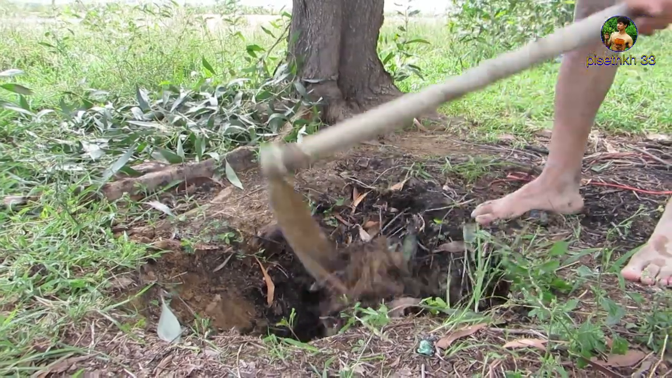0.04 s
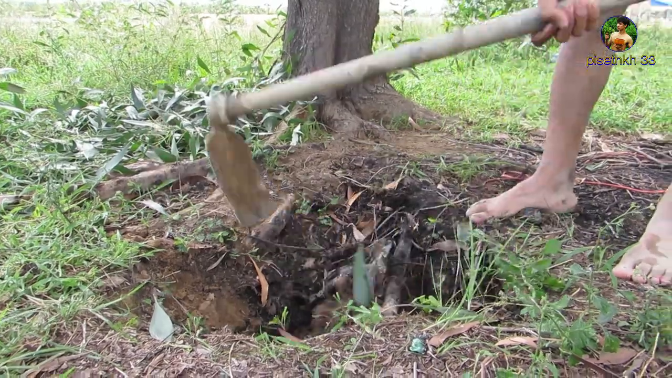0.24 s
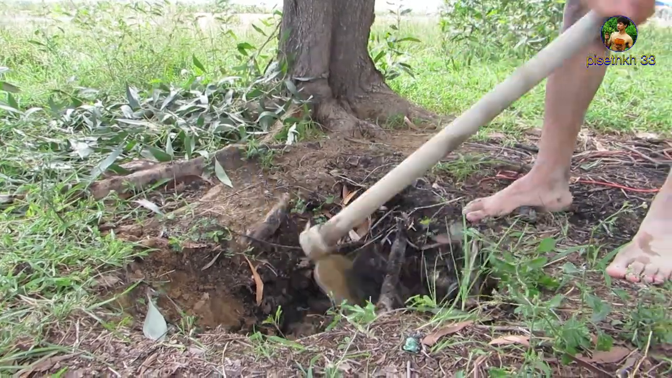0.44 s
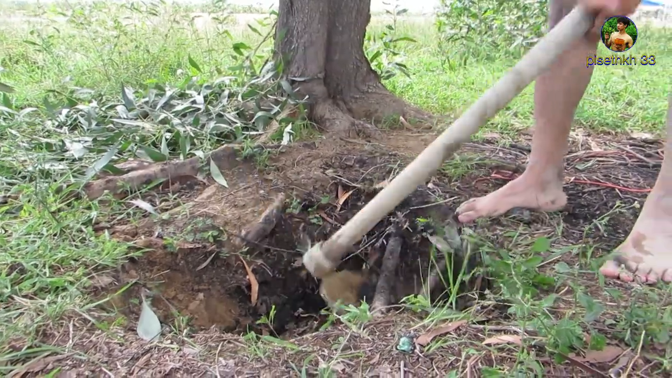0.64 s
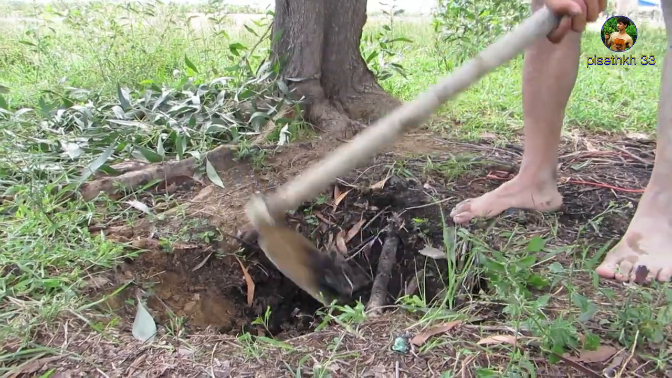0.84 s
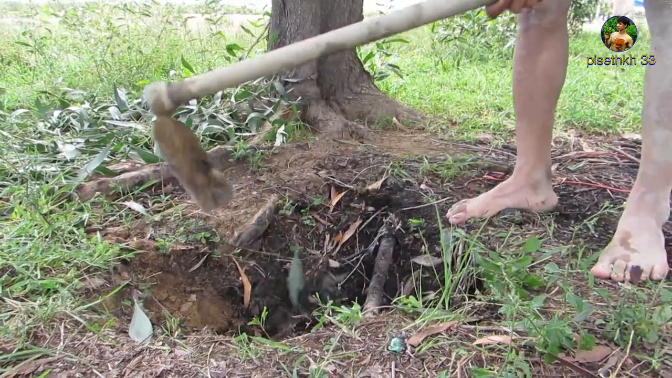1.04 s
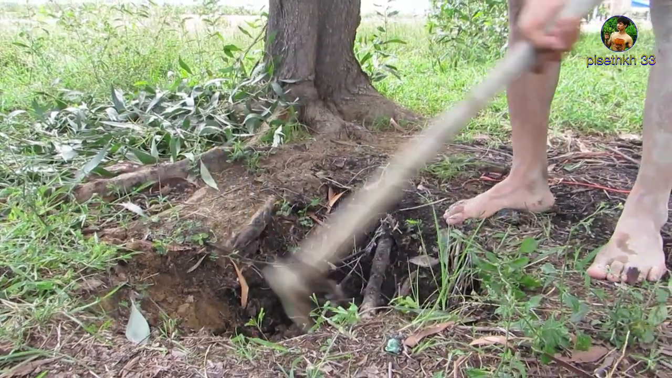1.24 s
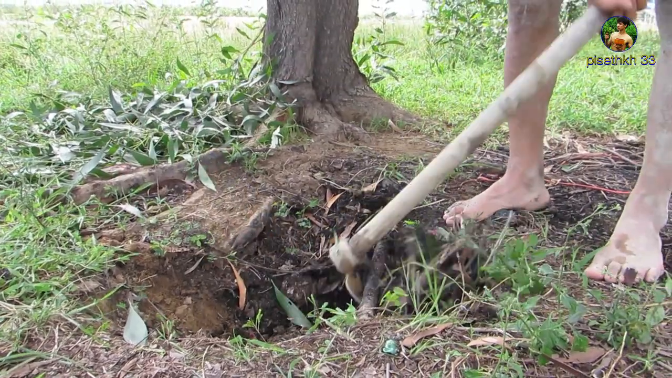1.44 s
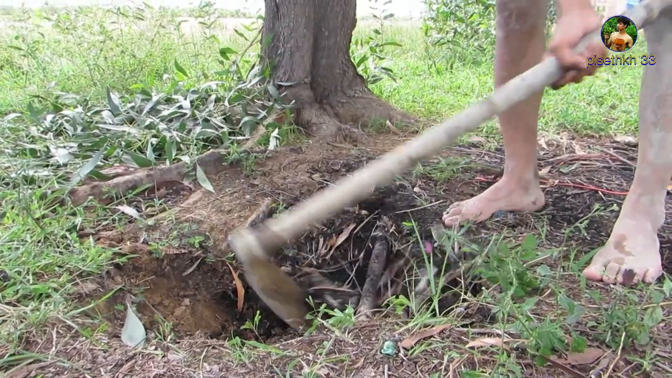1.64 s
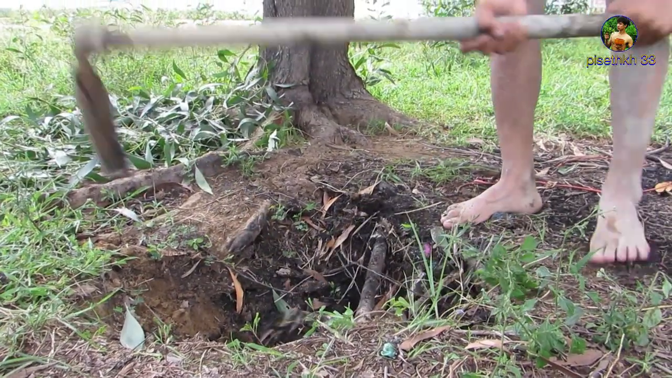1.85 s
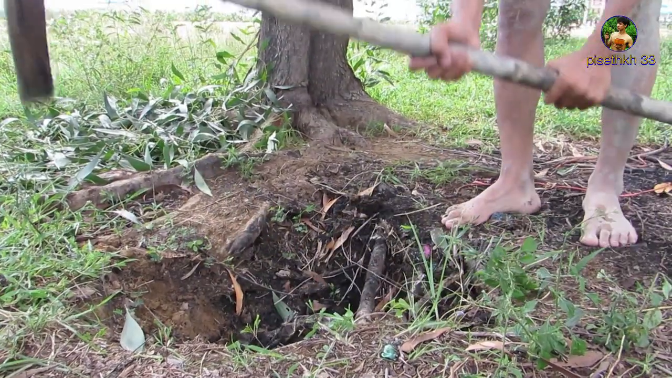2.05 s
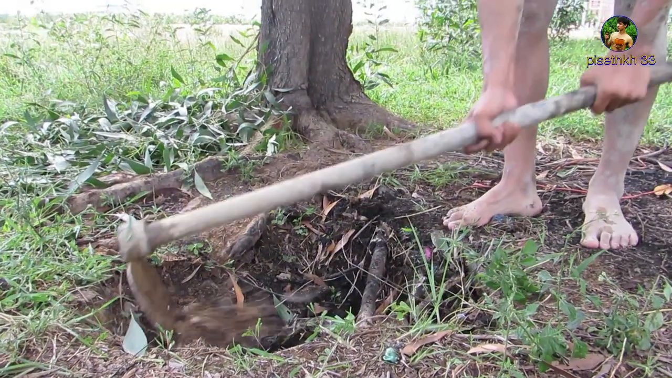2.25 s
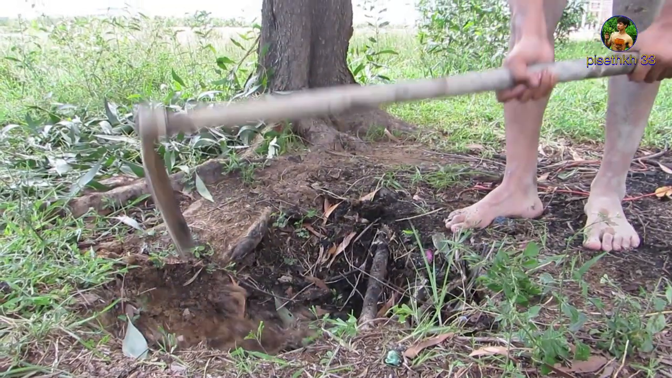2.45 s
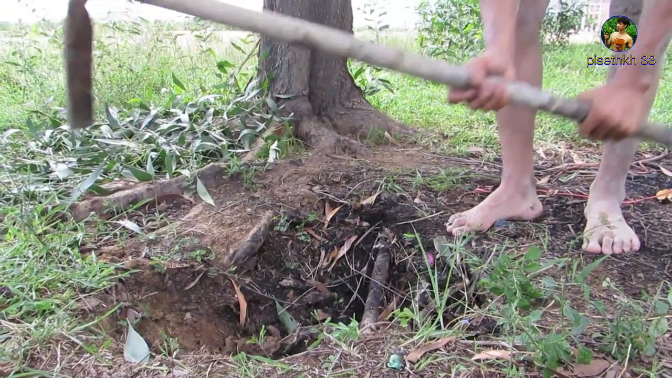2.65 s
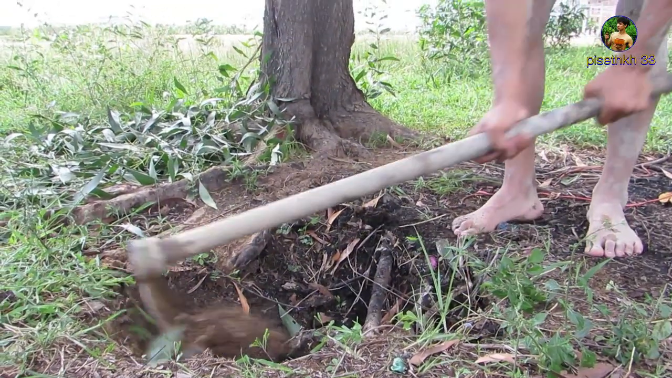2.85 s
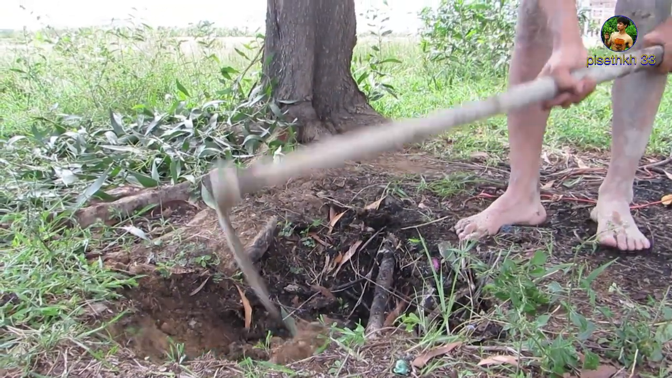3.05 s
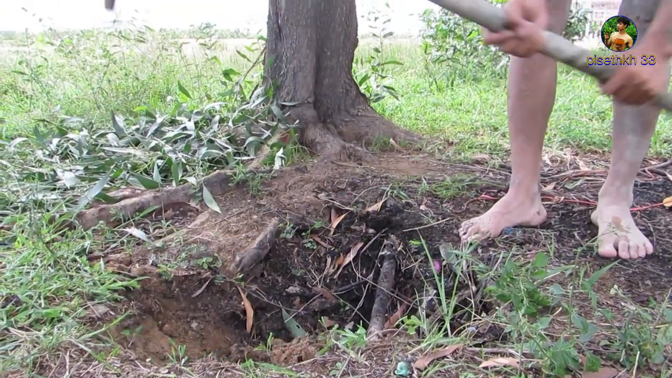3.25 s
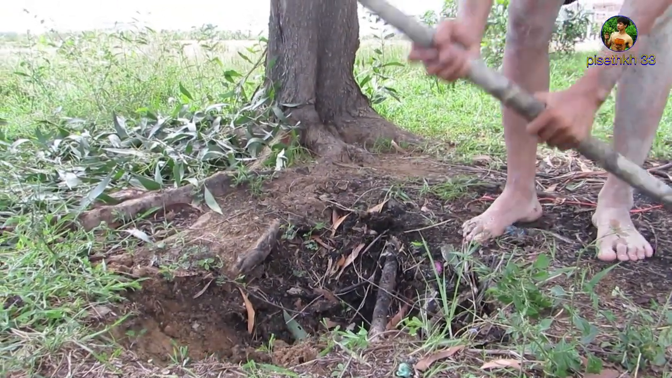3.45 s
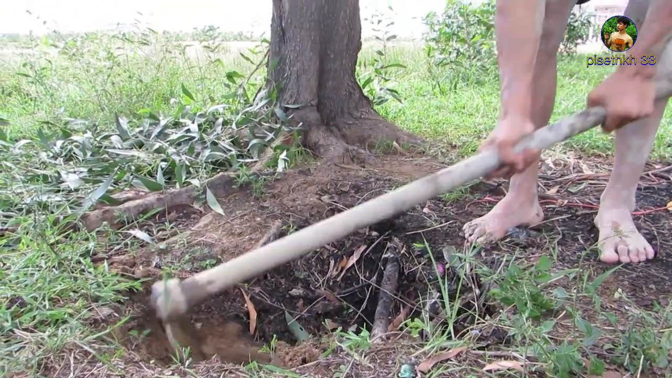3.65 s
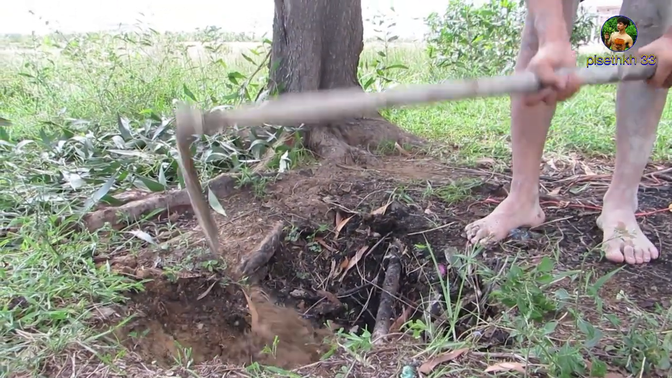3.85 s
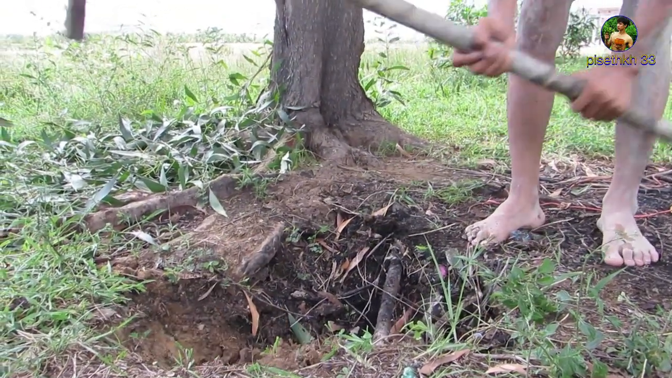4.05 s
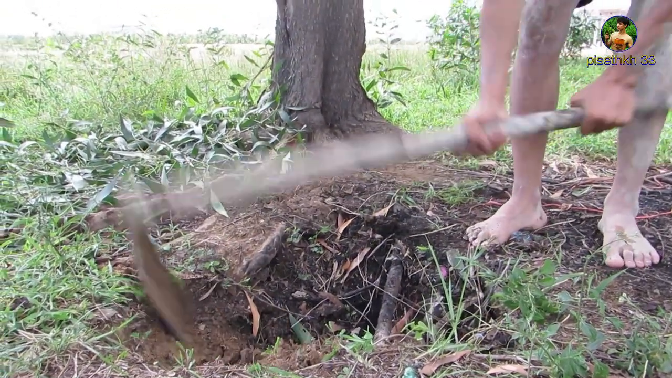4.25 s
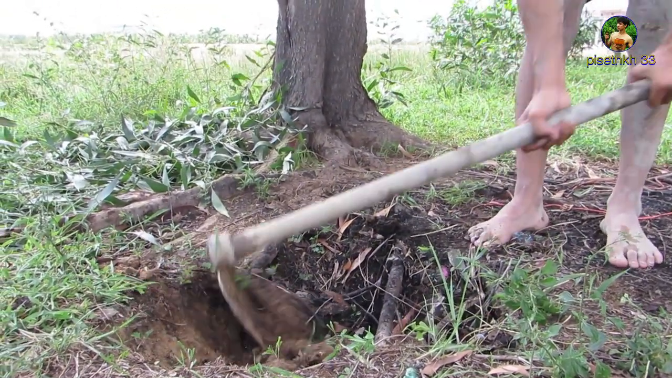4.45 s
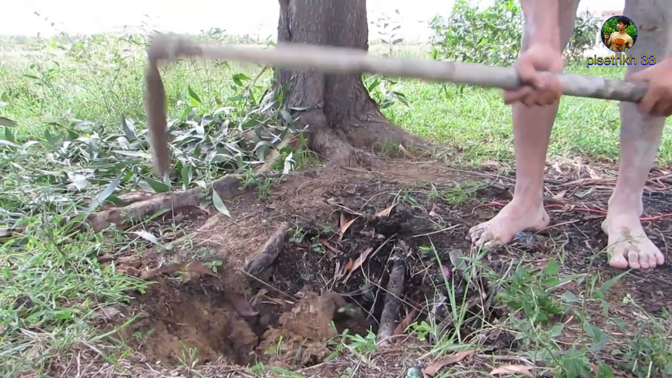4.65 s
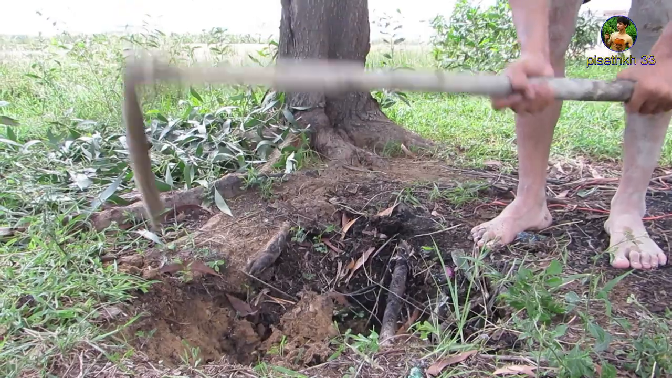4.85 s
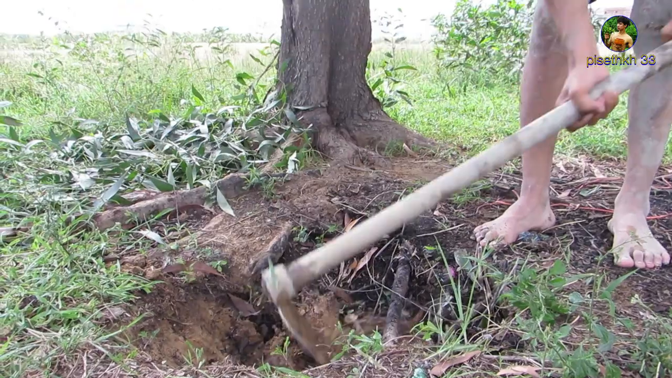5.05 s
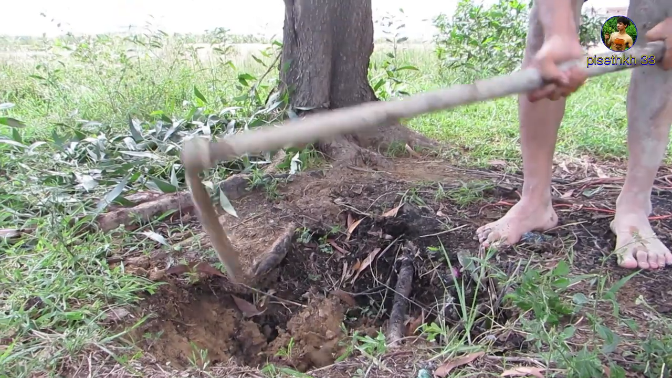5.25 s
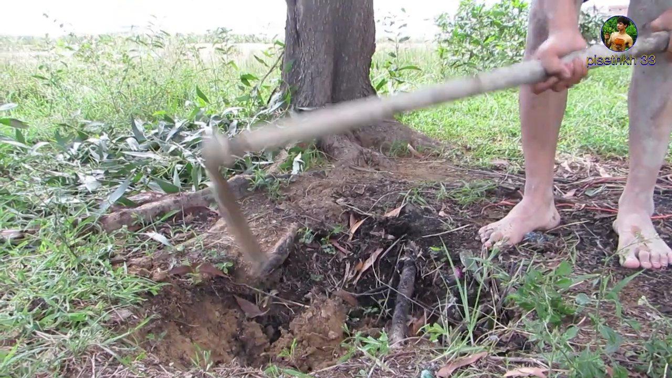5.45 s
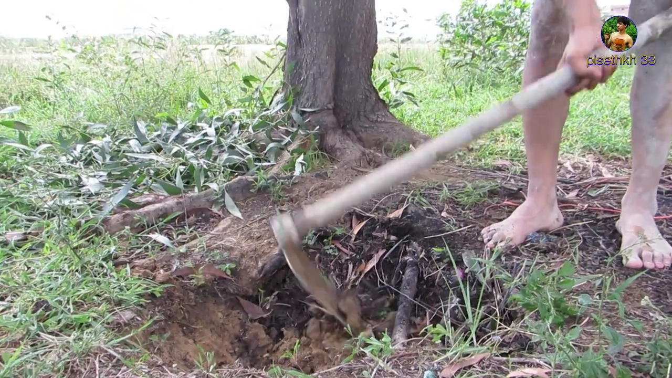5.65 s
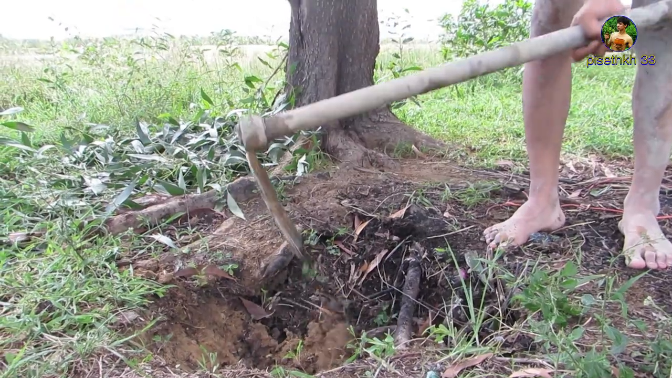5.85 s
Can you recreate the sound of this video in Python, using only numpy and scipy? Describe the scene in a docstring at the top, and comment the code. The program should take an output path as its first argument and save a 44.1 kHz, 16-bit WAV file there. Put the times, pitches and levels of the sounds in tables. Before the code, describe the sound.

Outdoors, wind rumbles steadily over the microphone while a hoe chops into the ground nearby about eight times. Roots and twigs crack loudly on the opening stroke, and a later one catches a stone with a very brief metallic ring. The remaining blows thud and crunch into packed earth, with crumbs of dirt sifting down after each. Far leaves rustle softly and a bird gives two barely audible squeaks.

```python
"""Hoe in dry soil

A steel hoe chops into soil and roots close to a camera: crumbs crush against the blade, twigs snap,
packed earth thuds, and once the edge sings on a stone. Loose earth trickles back into the hole.
Wind rumbles over the microphone and rustles far leaves; a bird squeaks twice.
The camera's gain control ducks after the loudest blows."""
import sys
import numpy as np
from scipy import signal
from scipy.fft import rfft, irfft, next_fast_len
from scipy.io import wavfile
from scipy.ndimage import uniform_filter1d, map_coordinates

SR = 44100
rng = np.random.default_rng(int(sys.argv[2]) if len(sys.argv) > 2 else 0)


def file_out(sig):
    """Save sig as 16-bit WAV at sys.argv[1]."""
    # one column per channel
    cols = np.atleast_2d(sig).T
    # limit, then scale
    lim = np.clip(cols, -1, 1)
    pcm = np.round(lim * 32767).astype(np.int16)
    wavfile.write(sys.argv[1], SR, pcm)


N = 260631

# grit and fine sand spectra: (frequency [Hz], relative density [dB])
GRIT_SPECTRUM = [(700, -18), (1500, -5), (2800, -4), (4800, -8.5), (7000, -29)]
SAND_SPECTRUM = [(3500, -9), (5500, 4), (8000, 3), (11500, -1), (13500, -7), (14800, -20), (16000, -21.5)]


def crunches():
    """Crumbs crush against the blade: the same impacts sound as grit, sand and clod."""
    # (hardest [s], rise [s], hold [s], fall [s], grit [dB], sand re grit [dB], clod re grit [dB])
    bites = [(0.368, 0.00078, 0.014, 0.042, -16, 1.5, -21), (0.413, .002, .002, 0.052, -16, -7, -17),
             (0.461, .002, .002, 0.016, -23, -8, -26), (0.472, .003, 0.02, 0.018, -17, -8, -37),
             (0.497, .003, 0.0038, 0.04, -19, -6, -19), (.564, 0.024, .002, 0.044, -34, -7, -18.5),
             (.588, .002, .002, .02, -30, -13, -31), (0.61, .008, .004, 0.033, -33, -5, -20),
             (0.652, 0.0044, 0.0046, 0.073, -31.5, -11.5, -10),
             (0.694, 0.0073, 0.055, 0.11, -44, -17, -12.5), (1.237, 0.0023, .02, .02, -40, -6, -10),
             (1.271, 0.026, 0.0084, .15, -32, -5, -6.5), (1.349, .015, .003, .03, -33.5, -5, -18),
             (1.408, 0.068, .005, 0.056, -30.5, -7.5, -8.5), (1.461, 0.0044, 0.0016, .045, -30, -12, -24),
             (1.926, 0.16, 0.011, 0.043, -43, -1, -18), (2.166, 0.0036, .015, .02, -46, 8.5, -30),
             (2.196, 0.011, 0.0026, 0.026, -17.5, 0, -5.5), (2.273, 0.033, .002, 0.025, -38, -10, -12),
             (2.378, 0.024, 0.12, .04, -49, -3, -5), (2.776, .014, 0.023, 0.023, -26, -2.5, -1),
             (2.831, .002, .01, 0.26, -39.5, -11, -18), (2.955, 0.047, .005, .05, -44.5, -17, -1),
             (3.143, 0.2, .005, 0.045, -51, -3.5, -8), (3.578, .001, .006, 0.023, -38, -1, -16),
             (3.588, .002, .005, .02, -26, -10, -8), (3.595, 0.0064, 0.0026, 0.024, -18.5, -6, -3.5),
             (3.655, .003, 0.0036, 0.024, -38.5, -4.5, -16), (4.237, .012, .03, .02, -49, 4.5, -12),
             (4.291, 0.013, .003, 0.034, -20.5, -8, -5.5), (4.336, .01, .01, 0.09, -41.5, -3, -9),
             (4.585, 0.016, .003, .06, -46, -5, -25), (4.948, 0.00089, 0.029, .02, -33, -6, 2),
             (4.979, 0.018, .004, 0.026, -21.5, -14.5, -11), (5.006, .005, .005, 0.13, -41, -6, -9),
             (5.084, 0.025, .005, 0.048, -42, -8, 2.5), (5.512, 0.011, 0.013, 0.032, -35, -2.5, -1),
             (5.539, 0.02, .002, 0.029, -24.5, -0.5, -6), (5.594, .02, 0.016, 0.028, -43, -7, -18),
             (5.636, 0.017, .003, 0.035, -36.5, -3, -3.5)]
    # (frequency [Hz], relative density [dB])
    clod_spectrum = [(180, -46), (330, -5.5), (480, 8.5), (640, -8.5), (900, 2.5), (1400, -25.5),
                     (2200, -74)]
    # (frequency [Hz], left-right coherence [0-1])
    coherence = [(500, 0.73), (2000, 0.93), (5000, 0.87), (12000, 0.39)]
    edge_db, sand_share = 20.5, 0.63  # loss per rise or fall; sand lingers
    power = np.zeros((3, N))
    for s, rise, hold, fall, db, sand_db, clod_db in bites:
        a, b = max(round((s - rise) * SR), 0), round((s + hold + 3 * fall) * SR)
        lost_db = edge_db * loss(s, rise, hold, fall)[a:b]
        power[:, a:b] += amp([db - lost_db, db + sand_db - sand_share * lost_db,
                              db + clod_db - lost_db]) ** 2
    level = np.sqrt(power)
    crush = grains(rate_hz=900, spread_db=4, hiss=2.2)
    grit = unit(coloured(crush, GRIT_SPECTRUM, coherence) + .25 * unit(blade(crush[:1])))
    sand = coloured(crush, SAND_SPECTRUM, coherence)
    clod = coloured(crush, clod_spectrum, coherence)
    return level[0] * grit + level[1] * sand + level[2] * clod


def snaps():
    """Twigs break, stones hit the blade: a sharp pulse, a few rough cycles, a dry crack on top."""
    # (time [s], level [dB], pitch [Hz], left minus right [dB])
    breaks = [(0.09, -18.5, 2180, 1), (0.3673, 1, 1900, 2), (0.3697, 7, 11500, 5), (0.3702, -2, 5000, -4),
              (.3806, -18, 3130, 1.5), (0.3839, 9.5, 2820, 2), (.3936, -3, 1160, 5), (.4155, -2, 1160, 4),
              (.4165, -2, 4500, 0), (.4324, -4, 5290, -2), (.4608, 2, 2340, 0), (0.4738, 6, 2330, 2),
              (0.476, -4.5, 1310, 5), (0.4868, 8.5, 4070, 1), (0.5, -1, 5300, 0), (0.5035, 4, 4380, -2),
              (0.522, -6.5, 2830, -2), (0.5386, -19, 1270, 9), (0.5595, -4, 3060, 2),
              (0.5892, -5.5, 2400, 0), (.611, -21, 1930, 3), (0.6185, -20, 1080, 1), (.6504, -17, 5160, -3),
              (0.6608, -20, 2620, 3), (0.6798, -18, 2010, -6), (0.7016, -10, 2120, 3),
              (0.8594, -25, 2260, -1), (0.8993, -24, 2940, .6), (1.039, -18.5, 2730, .6),
              (1.2385, -24, 2120, -1), (1.3624, -17, 3310, -3), (1.3919, -10, 3050, -2),
              (1.419, -12, 4810, 0), (1.4645, -8.5, 3300, -2), (1.468, -23, 1190, 6),
              (1.6344, -21.5, 2340, -.6), (1.6578, -25, 2210, 6), (1.77, -16.5, 2430, -.6),
              (1.86, -31.5, 2370, -15.5), (2.183, -20.5, 3030, 2.5), (2.1925, 0.5, 3250, 8),
              (2.1974, -6, 1760, -4), (2.2167, -8, 3160, -2), (2.2732, -16.5, 2470, 3),
              (2.296, -26, 2430, 1), (2.561, -31, 3270, 3), (2.7706, -18, 1750, 18), (2.792, -7, 1790, 1.5),
              (2.8374, -17.5, 3220, 10), (2.873, -27, 3000, 1), (2.9606, -24, 2190, 3),
              (3.5881, -14, 2650, 9), (3.5925, -7, 870, 7), (3.5967, -4, 2420, 0), (3.658, -25, 980, 6),
              (4.277, -25, 3230, 3), (4.286, -21, 1850, 4), (4.2909, -9, 2560, 7), (4.292, -11, 910, 6),
              (4.342, -24, 1770, 4), (4.5812, -27.5, 2680, .6), (4.9497, -24, 950, 1),
              (4.9712, -17, 1020, 0), (4.9766, -10.5, 1590, 7), (4.9842, -12, 3600, 0),
              (5.0763, -20, 3660, -1), (5.0865, -20, 1600, 3), (5.2033, -26, 2540, .6),
              (5.5063, -25, 958, 1), (5.5308, -7, 2700, -3), (5.529, -4, 11600, 3), (5.535, -8, 1030, 3),
              (5.5361, 2, 5130, 0), (5.5458, -16, 1170, 6), (5.546, -6, 9000, 4), (5.5804, -20.5, 1180, 3),
              (5.5923, -20.5, 3670, .6), (5.6291, -26, 1130, .6), (5.6485, -21, 3260, -3)]
    t60_cycles, crack_db = 16.7, -20
    out, t = np.zeros((2, N + SR)), np.arange(SR // 25) / SR
    noises = rng.standard_normal((len(breaks), 2, len(t)))
    treble = signal.butter(1, [5500, 11000], "band", fs=SR, output="sos")
    for (s, db, hz, pan_db), (noise, hiss) in zip(breaks, noises):
        fade = amp(-60 * t * hz / t60_cycles) * (1 - np.exp(-t * hz / 0.76))
        # fibres part one after another, widening the pitch to a band
        band = signal.butter(2, [hz / 1.7, hz * 1.7], "band", fs=SR, output="sos")
        fibres = unit(signal.sosfilt(band, noise))
        body = fade * (.55 * np.sin(2 * np.pi * hz * t) + .5 * fibres)
        click = 0.38 * amp(-60 * t * hz / 3) * np.sin(2 * np.pi * 0.84 * hz * t)
        crack = amp(crack_db - 60 * t / 0.009) * signal.sosfilt(treble, hiss)
        gains = amp(db + np.array([[pan_db], [-pan_db]]) / 2)
        out[:, round(s * SR):][:, :len(t)] += gains * (click + body + crack)
    return out[:, :N] + 0.0078 * blade(out[:, :N])


def thuds():
    """The blade stops in packed earth: a dull push and its rebound."""
    # (time [s], relative level [dB], pitch [Hz], push or pull [+1/-1])
    stops = [(.368, -15.5, 480, 1), (2.191, -18, 264, -1), (2.196, -31, 168, 1), (2.774, -13.5, 151, 1),
             (2.785, -20, 114, -1), (3.593, -7.5, 163, -1), (3.607, -15, 110, 1), (4.293, -13.5, 137, -1),
             (4.947, -14.5, 287, 1), (4.965, -32, 138, -1), (5.534, -19.5, 354, 1)]
    out, t = np.zeros(N + SR), np.arange(SR // 10) / SR
    for s, db, hz, polarity in stops:
        fade = amp(db + 2.5 - 60 * t * hz / 6)
        out[round(s * SR):][:len(t)] += polarity * fade * np.sin(2 * np.pi * hz * t)
    return out[:N]


def skid():
    """The edge skids on a stone: one blade mode swells under stick-slip and stops dead."""
    # (start [s], catch [s], pitch [Hz], start level [dB], catch level [dB])
    slips = [(2.174, 2.1935, 2930, -38, -13)]
    out, t = np.zeros(N), np.arange(N) / SR
    for start, catch, hz, start_db, catch_db in slips:
        swell = amp(np.interp(t, [start, catch, catch + 0.0047], [start_db, catch_db, -70]))
        out += (t > start) * (t < catch + .003) * swell * np.sin(2 * np.pi * hz * t)
    return out


def blade(force):
    """The steel rings briefly, damped by the soil."""
    # (frequency [Hz], level [dB], t60 [s])
    modes = [(1223, -7, 0.035), (1810, -22, 0.1), (2912, -15, 0.095), (5420, -16, 0.018),
             (7560, -62.5, 0.045)]
    t = np.arange(SR // 10) / SR
    ring = sum(amp(db - 60 * t / t60) * np.sin(2 * np.pi * hz * t) for hz, db, t60 in modes)
    return signal.fftconvolve(force, ring[None], axes=1)[:, :N]


def trickle():
    """Loose earth runs back in tiny impacts, over a steady rustle of leaves."""
    # (fullest [s], swell [s], fade [s], grit [dB], sand re grit [dB])
    spills = [(0, .1, 0.35, -41, -2.5), (.6, 0.14, 0.5, -49.5, -0.5), (1.1, 0.28, 0.17, -53, -1.5),
              (1.41, 0.18, 0.6, -42, -4), (1.9, 0.28, 0.11, -51.5, 3), (2.45, 0.6, 0.35, -50.5, -2),
              (2.93, .15, 0.32, -43, -2), (3.43, 0.12, 0.11, -48, -5.5), (3.74, 0.3, 0.35, -48, -7.5),
              (4.45, .12, .5, -50, -0.5), (5.1, 0.081, 0.26, -49, -5.5), (5.66, .1, .15, -55, -2)]
    # (frequency [Hz], left-right coherence [0-1])
    coherence = [(1400, 0.15), (3100, 0.56), (7000, 0.52), (14000, 0.27)]
    leaf_mid_db, leaf_treble_db = -52.5, -58
    edge_db = 12  # loss per swell or fade
    power = amp([[leaf_mid_db], [leaf_treble_db]]) ** 2
    for s, swell, fade, db, sand_db in spills:
        level_db = db - edge_db * loss(s, swell, 0, fade)
        power = power + amp([level_db, level_db + sand_db]) ** 2
    sift = amp(1.1 * wobble(30))
    grit = coloured(sift * grains(rate_hz=300, spread_db=5.5, hiss=4.1), GRIT_SPECTRUM, coherence)
    sand = coloured(sift * grains(rate_hz=250, spread_db=7, hiss=4.8), SAND_SPECTRUM, coherence)
    return np.sqrt(power[0]) * grit + np.sqrt(power[1]) * sand


def wind():
    """Eddies at the microphone ports: coherent in the bass, unrelated higher up."""
    # (time [s], level [dB])
    gusts = [(0, -27.5), (.25, -28), (.55, -29.5), (.8, -31.5), (1.3, -27.5), (1.74, -27), (2.05, -26.5),
             (2.45, -31.5), (2.85, -27.5), (3.3, -29.5), (3.8, -30.5), (4.4, -31), (4.8, -29),
             (5.05, -31.5), (5.4, -28.5), (5.91, -30.5)]
    # (frequency [Hz], relative density [dB])
    rumble_spectrum = [(12, -27), (20, -12.5), (38, 2.5), (59, -2.5), (91, -0.5), (102, -1), (119, -4),
                       (188, -7.5), (260, -25), (340, -59), (570, -120)]
    flutter_spectrum = [(120, -11.5), (200, -1), (295, -7), (355, -8.5), (465, -18.5), (691, -18.5),
                        (1500, -29.5), (1950, -60), (3300, -120)]
    # (frequency [Hz], left-right coherence [0-1])
    coherence = [(60, 0.99), (130, 0.98), (290, 0.88), (640, 0.0098), (1400, 0.033)]
    flutter_offset_db, flutter_swing = -6, 0.81
    rumble_db, = curves(gusts)
    mean_db = rumble_db.mean()
    flutter_db = mean_db + flutter_offset_db + flutter_swing * (rumble_db - mean_db)
    rumble = coloured(rng.standard_normal((2, N)), rumble_spectrum, coherence)
    eddies = amp(2.33 * wobble(25)) * rng.standard_normal((2, N))
    flutter = coloured(eddies, flutter_spectrum, coherence)
    return amp(rumble_db + 0.34 * wobble(45)) * rumble + amp(flutter_db) * flutter


def bird():
    """Two far, arched squeaks, made of overtones only."""
    # per call: (time [s], pitch [Hz], level [dB])
    calls = [
        [(3.11, 1210, -56), (3.13, 1305, -53), (3.146, 1304, -50), (3.155, 1240, -64)],
        [(3.71, 1210, -62), (3.722, 1300, -53), (3.738, 1390, -49.5), (3.749, 1220, -63)],
    ]
    # (harmonic [number], relative level [dB])
    overtones = [(2, -6), (3, 3), (4, 1), (5, -1)]
    out, t = np.zeros(N), np.arange(N) / SR
    for call in calls:
        hz, db = curves(call)
        phase = 2 * np.pi * np.cumsum(hz) / SR
        gate = (t > call[0][0]) & (t < call[-1][0])
        tone = sum(amp(level_db) * np.sin(k * phase) for k, level_db in overtones)
        out += gate * amp(db + 3.3 * wobble(250)) * tone
    return out


def housing(hz):
    """Response of the microphone housing: two narrow dips."""
    # (centre [Hz], width [Hz], depth [0-1])
    notches = [(3978, 294, 1), (8060, 300, 0.5)]
    return np.prod([1 - depth * 1j * hz * width / (centre ** 2 - hz ** 2 + 1j * hz * width)
                    for centre, width, depth in notches], axis=0)


def gain_control(x):
    """Loud middle and treble pull the gain down fast; it returns at a steady rate."""
    threshold_db, slope, attack_s, release_db_per_s = -21, 0.93, 0.015, 26.5
    sidechain = filtered(x.mean(0), lambda hz: hz / (hz + 500))
    level_db = 10 * np.log10(np.abs(uniform_filter1d(sidechain ** 2, size=440)) + 1e-12)
    cut_db = slope * np.maximum(level_db - threshold_db, 0)
    ramp_db = release_db_per_s * np.arange(N) / SR
    held_db = np.maximum.accumulate(cut_db + ramp_db) - ramp_db
    pole = np.exp(-1 / (attack_s * SR))
    return x * amp(-signal.lfilter([1 - pole], [1, -pole], held_db))


def grains(rate_hz, spread_db, hiss):
    """Random tiny impacts of uneven size over a bed of hiss."""
    hit = rng.random(N) < rate_hz / SR
    size = uniform_filter1d(hit * amp(spread_db * np.clip(rng.standard_normal(N), -2, 2)), size=24)
    return (unit(size) + hiss) * rng.standard_normal((2, N))


def loss(peak_s, rise_s, hold_s, fall_s):
    """0 while held, 1 at a rise before and a fall after, growing on from there."""
    t = np.arange(N) / SR - peak_s
    return np.maximum(-t / rise_s, 0) + np.maximum(t - hold_s, 0) / fall_s


def coloured(pair, spectrum, coherence):
    """Two unrelated signals to stereo at rms 1, with a given spectrum and coherence."""
    def response(hz):
        angle = np.arccos(along(coherence, hz)) / 2
        return amp(along(spectrum, hz)) * [np.cos(angle), np.sin(angle)]
    mid, side = filtered(pair, response)
    return unit(np.array([mid + side, mid - side]))


def filtered(x, response):
    """x through a frequency response."""
    size = next_fast_len(N + SR // 2)
    return irfft(rfft(x, size) * response(np.fft.rfftfreq(size, 1 / SR)), size)[..., :N]


def wobble(rate_hz):
    """Smooth random curve with knots at rate_hz."""
    knots = rng.standard_normal(int(N * rate_hz / SR) + 4)
    return map_coordinates(knots, [np.arange(N) * rate_hz / SR])


def curves(rows):
    """One value per sample for each column after the time."""
    s, *columns = np.transpose(rows)
    return np.array([np.interp(np.arange(N) / SR, s, c) for c in columns])


def along(points, hz):
    """Interpolate (frequency [Hz], value) on a log axis."""
    knots_hz, values = np.transpose(points)
    return np.interp(np.log(hz + 1), np.log(knots_hz + 1), values)


def amp(db):
    """dB to gain."""
    return 10 ** (np.asarray(db) / 20)


def unit(x):
    """x at rms 1."""
    return x / np.sqrt(np.mean(x ** 2) + 1e-20)


def scene():
    """Hoe slightly left, wind all round."""
    hoe = (crunches() + thuds() + skid()) * amp([[.7], [-.7]])
    return hoe + snaps() + trickle() + bird() + wind()


def record(dry):
    """Housing dips, low cut, gain control, soft overload, band limit."""
    low_cut_hz, roll_off_hz, top_hz = 28, 14500, 15800
    x = filtered(dry, lambda hz: housing(hz) * (hz / low_cut_hz) ** 3 / (1 + (hz / low_cut_hz) ** 3))
    x = gain_control(x)
    x = x / (1 + np.abs(x) ** 8) ** (1 / 8)
    return filtered(x, lambda hz: (hz < top_hz) / np.sqrt(1 + (hz / roll_off_hz) ** 30))


dry = scene()
out = record(dry)
file_out(out)
```